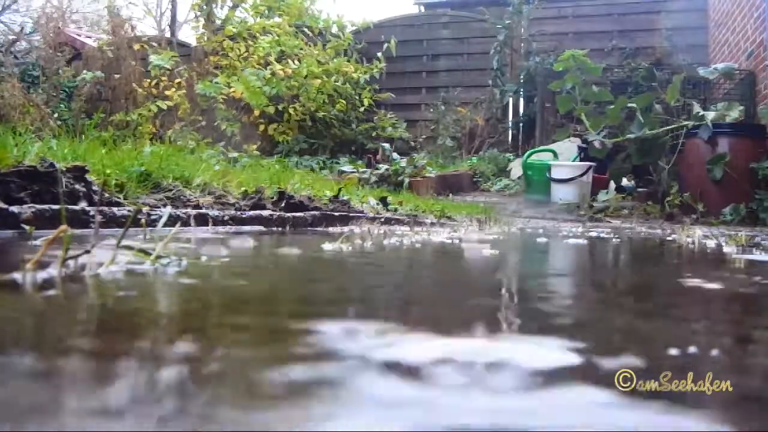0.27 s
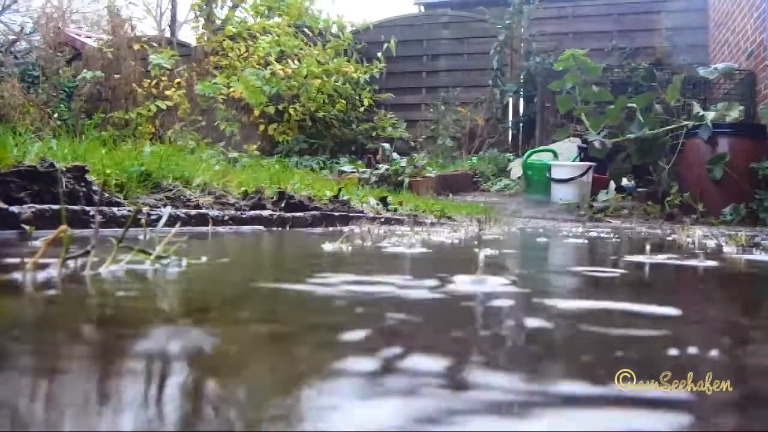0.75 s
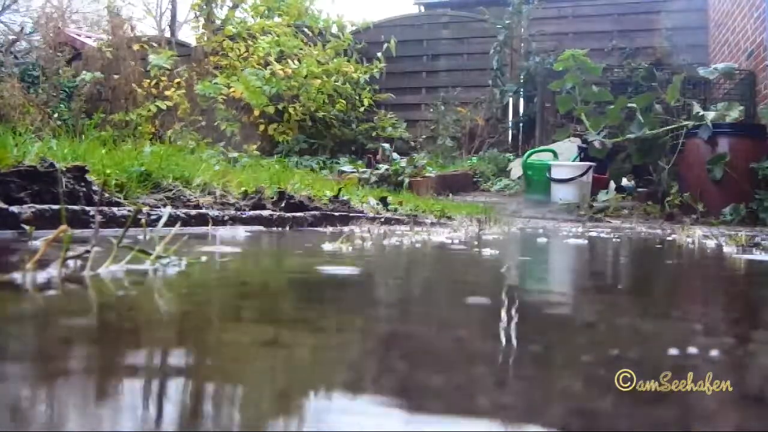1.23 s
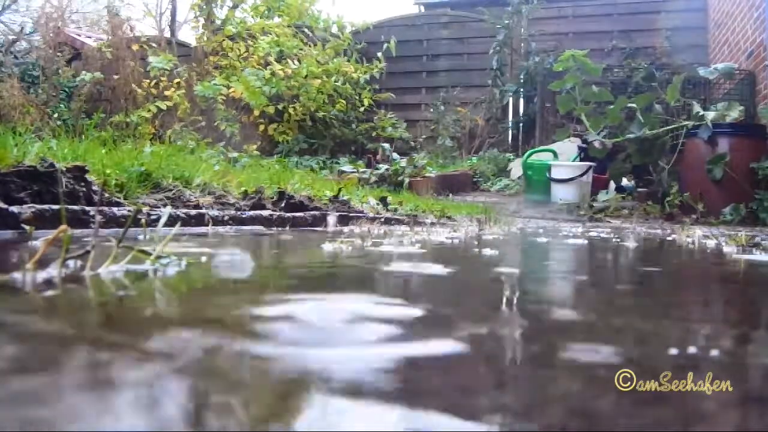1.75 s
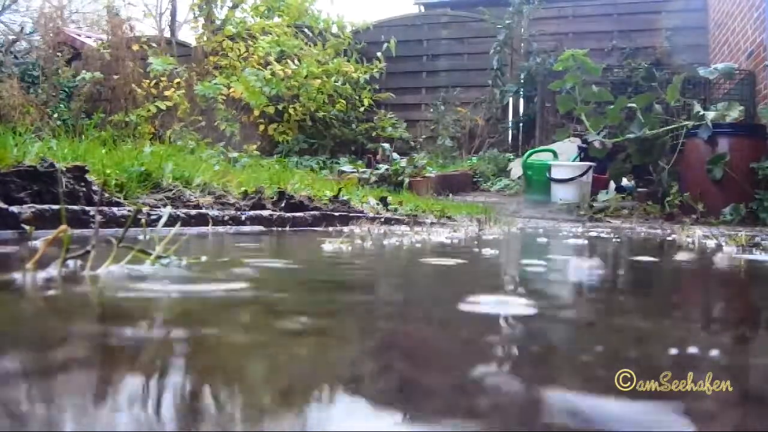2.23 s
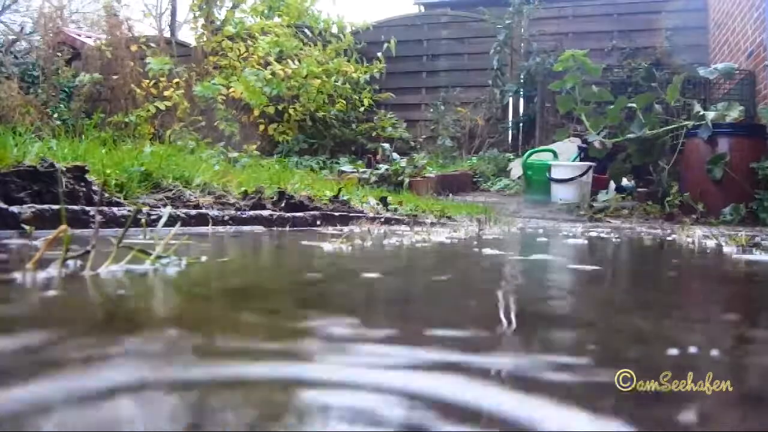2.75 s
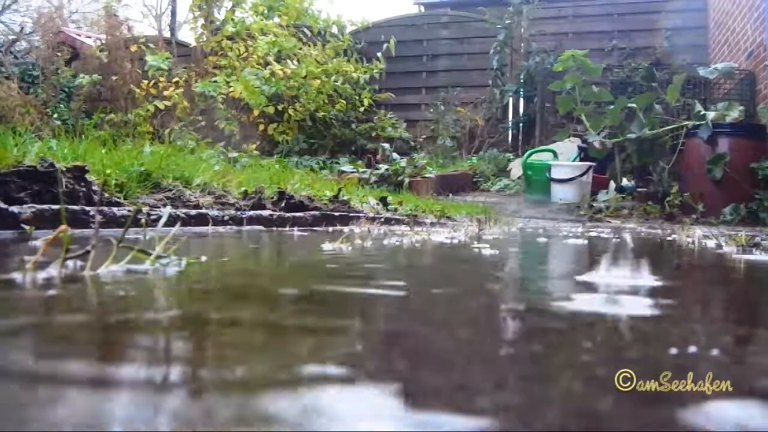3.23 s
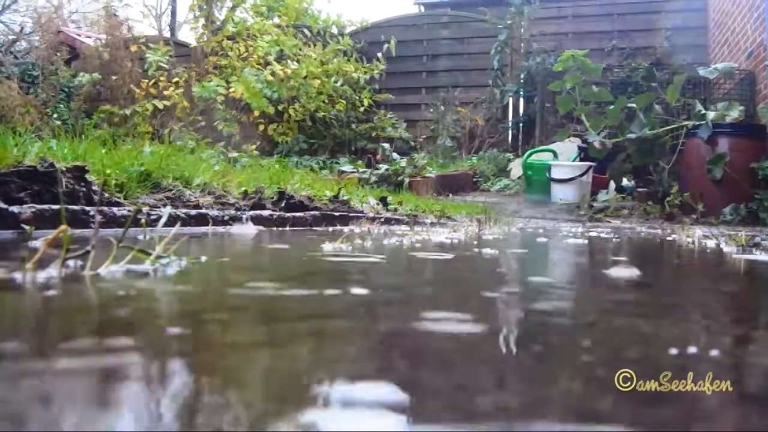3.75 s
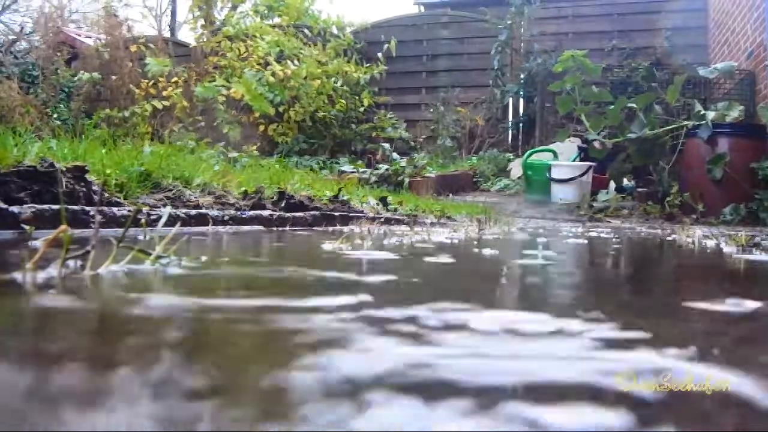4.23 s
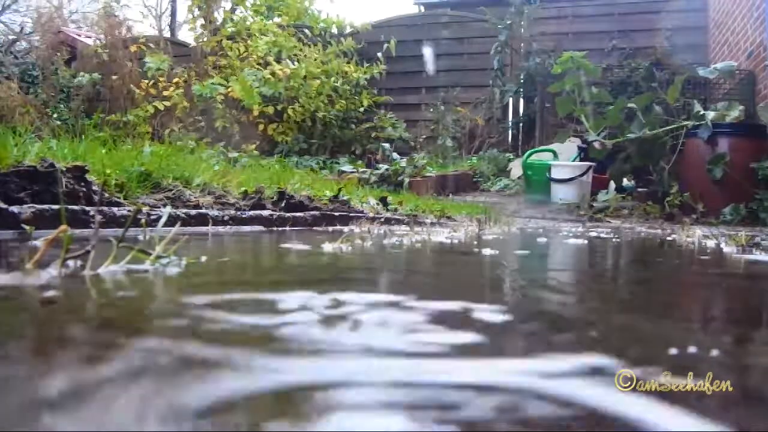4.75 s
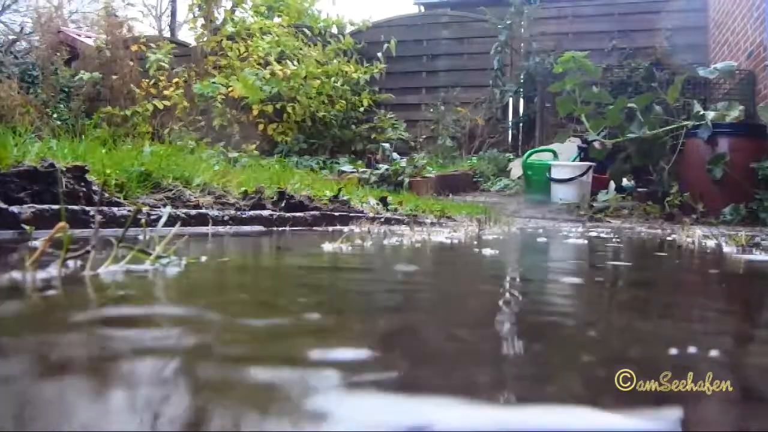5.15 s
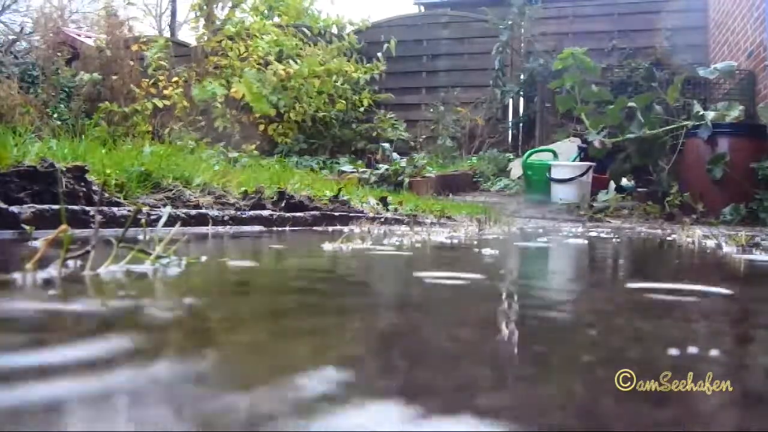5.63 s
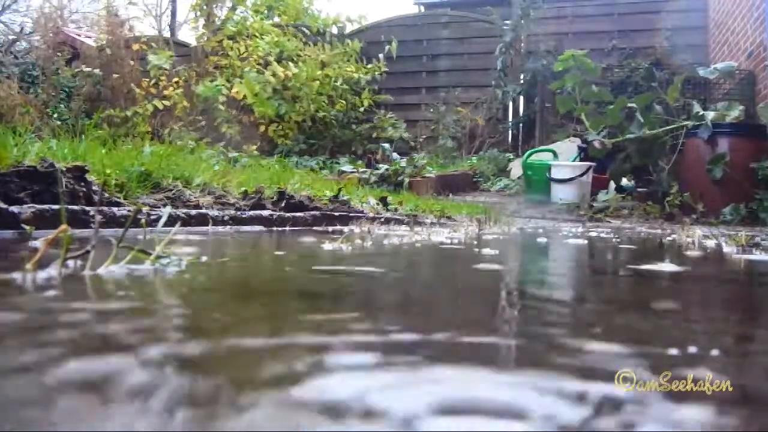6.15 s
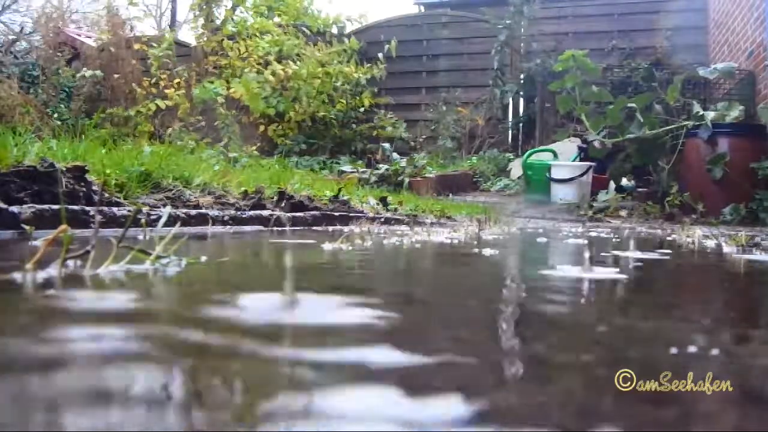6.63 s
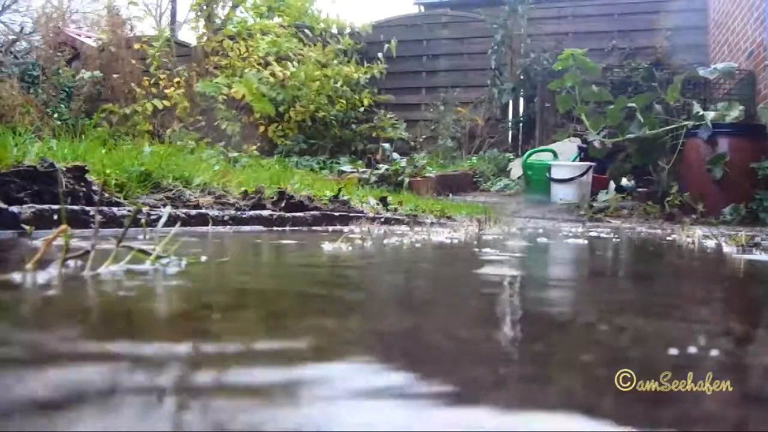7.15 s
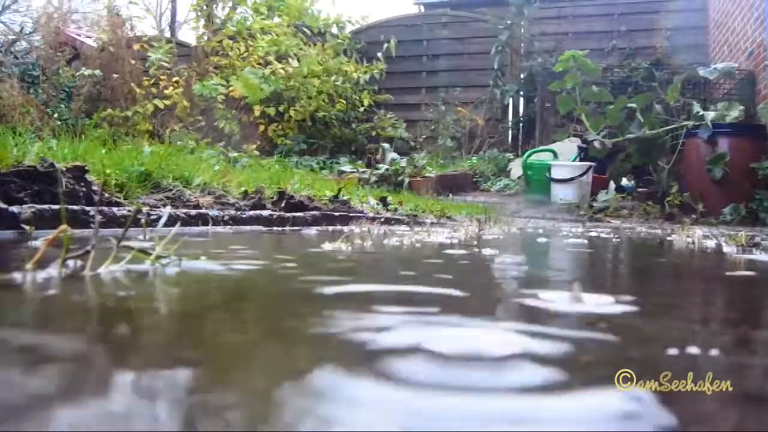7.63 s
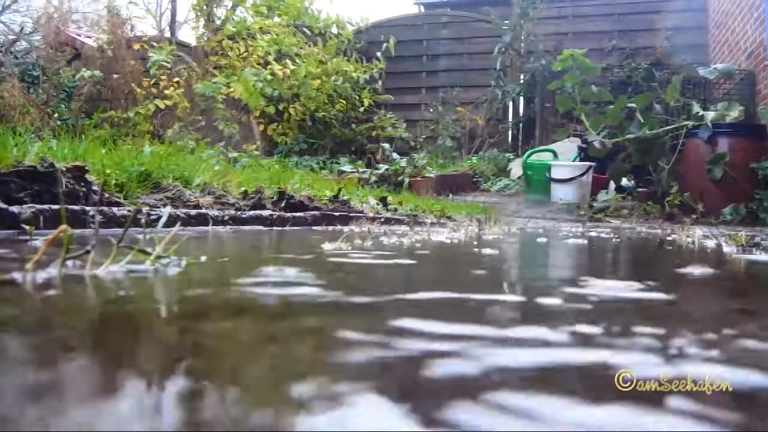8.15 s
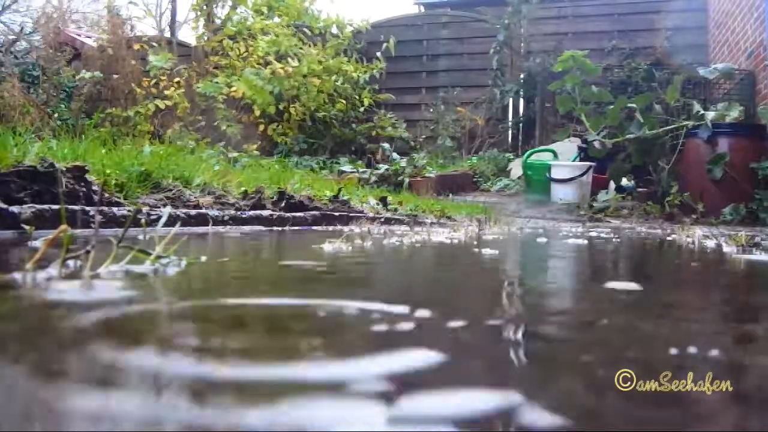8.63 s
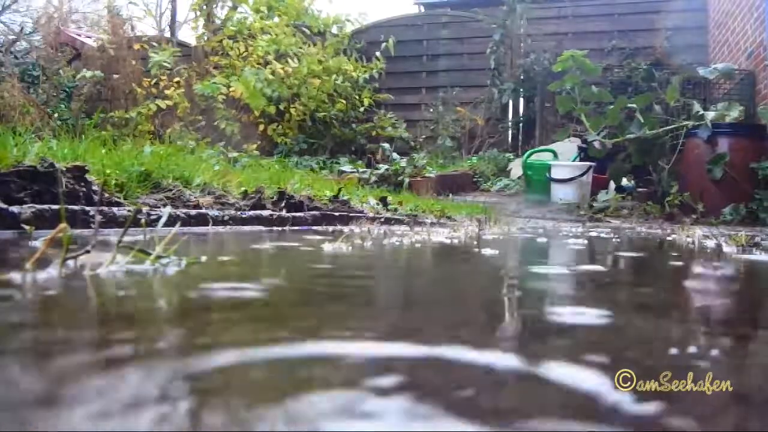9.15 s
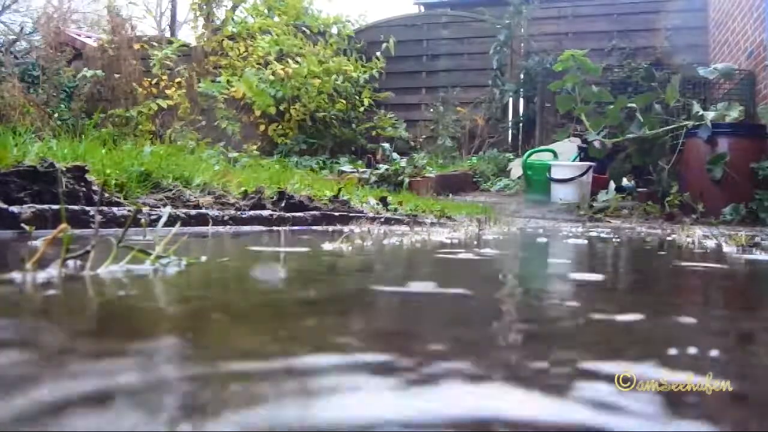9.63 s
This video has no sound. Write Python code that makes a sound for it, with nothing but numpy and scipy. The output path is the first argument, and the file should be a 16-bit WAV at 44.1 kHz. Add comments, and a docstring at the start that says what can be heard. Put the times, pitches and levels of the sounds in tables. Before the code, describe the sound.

Steady garden rain is heard for about ten seconds from a microphone low at the edge of a shallow puddle. Distant drops merge into a bright, even hiss, with dense, fine patter on water, grass and leaves. Underneath lies a dull outdoor wash, slightly louder at first. Nearer drops stand out as crisp, irregular ticks, more frequent after 5 seconds, along with a few soft, low knocks.

Several drops strike the microphone's housing, each a sharp click with a very short ring and a small thud. Loud ones land at about 0.5 and 1.5 seconds, lighter ones at 1.7 and 6.2, and the loudest at 7.1. The hardest hits overload the microphone and make the rain dip for an instant. A softer, duller knock follows near 7.9 seconds, and the hiss and ticking carry on to the end.

```python
"""A steady hiss of garden rain, heard from a camera standing low at the edge of a shallow puddle.
Countless far drops merge into that hiss, while near drops tick on the water, the grass and the leaves.
A few strike the camera itself: they ring its case, overload the microphone and make the gain duck.
Underneath lies the dull wash of the wet neighbourhood."""
import sys
import numpy as np
from scipy import signal
from scipy.fft import rfft, irfft
from scipy.io import wavfile
from scipy.ndimage import uniform_filter1d

SR = 44100
rng = np.random.default_rng(int(sys.argv[2]) if len(sys.argv) > 2 else 0)


def persist_wave(psi):
    """Save psi, clipped to +-1, as 16-bit WAV."""
    counts = np.round(np.clip(psi, -1, 1) * 32767).astype(np.int16)
    wavfile.write(sys.argv[1], SR, np.atleast_2d(counts).T)


N = 435708
TIME = np.arange(N) / SR
AGE = np.arange(SR // 20) / SR  # seconds since an impact
TOP_HZ = 12800

# tone colour of the far drops: frequency_hz, relative_level_db
HISS_COLOUR = [(1000, -25.5), (1700, -9), (2400, -8), (3400, -8.5), (4400, -7), (5400, -2.5), (6400, 2),
               (7300, -3), (8500, -7), (9500, -11), (10500, -18.5), (11500, -20.5), (12200, -31),
               (13000, -46)]
# fader ride on the hiss as the shower swells and slackens: time_s, gain_db
HISS_RIDE = [(0, 0.5), (1.8, 0.5), (2.7, -0.1), (3.2, 0.6), (4.95, -0.8), (5.5, 0.7), (5.8, -0.1),
             (7.7, 0.4), (8.1, -0.6), (8.8, 0.2), (9.3, -1.5), (9.9, 0)]
# the nearest drops on water and leaves: start_s, level_db, pitch_hz, swell_ms
NEAR_DROPS = [(0.1424, -27, 9600, 0.43), (0.3205, -31, 8250, .22), (1.584, -28, 2650, 0.85),
              (2.4163, -36, 1450, .94), (2.4316, -35, 4150, .6), (2.9928, -35, 2140, 0.77),
              (4.386, -29, 8440, .27), (5.325, -26.5, 8780, 0.097), (5.563, -25.5, 2920, 0.31),
              (5.934, -26.5, 8900, 0.1), (6.0615, -31, 9250, 0.16), (6.375, -36.5, 2080, 0.65),
              (6.535, -33.5, 3730, 0.18), (6.7712, -28.5, 5400, 0.73), (6.9562, -33, 11060, .2),
              (7.1855, -26.5, 8780, 0.29), (7.7934, -26, 3580, 0.16), (8.0787, -25.5, 5850, 0.54),
              (8.745, -32, 5110, 0.13), (8.889, -25.5, 2180, .36), (8.9261, -29.5, 6400, 0.39),
              (8.9925, -33, 4550, .2), (9.5473, -36, 2960, 0.35), (9.631, -30.5, 3610, .21),
              (9.7115, -32, 9480, .27)]
# drops that hit the camera: start_s, tick_db, tick_hz, swell_ms, ring_db, spray_db, thud_db, thud_hz
CAMERA_STRIKES = [ (0.4927, 5.5, 5490, 0.23, -29, -13, -21, 480),
                  (1.4740, 5.5, 3600, 0.22, 0, -19, -18, 650),
                  (1.746, -10.3, 5780, 0.2, -20, -24, -47, 460),
                  (6.2130, -12, 4050, 0.23, -25.5, -31, -21, 477),
                  (7.0774, 13.5, 2950, 0.11, 0.3, -19, -34, 480),
                  (7.8697, -28, 1240, 0.63, -41, -33, -20.5, 350), ]
# resonances of the camera case: pitch_hz, relative_level_db, t60_s
CASE_MODES = [(1520, -4.5, 0.0026), (2790, -6, 0.0083), (4180, -4.5, 0.0031), (4750, -24.5, 0.032),
              (6540, -3, 0.0042), (7740, -14, 0.015), (8800, -14, 0.0029)]
# soft low knocks of drops close by: start_s, level_db, pitch_hz, swell_s
SOFT_KNOCKS = [(3.729, -41, 300, .0015), (5.523, -42.5, 170, 0.0019), (5.998, -38, 302, 0.0011),
               (6.162, -44, 130, 0.0017), (7.873, -32, 148, 0.0023), (8.981, -34, 400, 0.0005)]
# tone colour of the outdoor wash: frequency_hz, relative_level_db
WASH_COLOUR = [(20, -26), (50, -16.5), (100, -13.5), (200, -13.5), (300, -11), (430, -3.5), (580, 0.5),
               (750, -2), (1000, -4), (1250, -8), (1540, -9.5), (1660, -18.5), (2400, -17), (5000, -43)]


def rain_hiss(level_db=-49, gust_db=0.58, flutter_db=0.71):
    """Countless far drops blur into a bright bed that wavers slightly with the shower."""
    ride_db = np.interp(TIME, *np.transpose(HISS_RIDE))
    waver_db = gust_db * wander(rate_hz=10) + flutter_db * wander(rate_hz=40)
    return coloured_noise(HISS_COLOUR) * undb(level_db + ride_db + waver_db)


def garden_patter():
    """High to low: finest spatter, ticks on the puddle, fuller drops on grass, taps on leaves, plops."""
    return (scatter(count=450, db=-60.5, spread_db=5, centre_hz=11200, octaves=0.23, swell_cycles=2.9)
            + scatter(count=700, db=-55.5, spread_db=5, centre_hz=8800, octaves=0.45, swell_cycles=2.2)
            + scatter(count=1500, db=-51, spread_db=4, centre_hz=6250, octaves=0.62, swell_cycles=1.5)
            + scatter(count=350, db=-54, spread_db=4, centre_hz=3020, octaves=0.8, swell_cycles=0.76)
            + scatter(count=40, db=-50.5, spread_db=3, centre_hz=1500, octaves=1.83, swell_cycles=1.3))


def near_drops(spray_db=-7.5):
    """The closest drops stand out one by one: crisp ticks with a puff of spray, and a few soft knocks."""
    out = np.zeros(N)
    for start_s, db, hz, swell_ms in NEAR_DROPS:
        add(out, start_s, tick(db, hz, swell_ms))
        add(out, start_s, spray(db + spray_db, 0.65 * hz, min(1.34 * hz, 10500), decay_s=0.0016))
    for start_s, db, hz, swell_s in SOFT_KNOCKS:
        add(out, start_s, thud(db, hz, swell_s))
    return out


def camera_strikes(thud_swell_cycles=0.19):
    """Each hit layers a sharp tick, a ring of the case, a burst of spray and a thud through the body."""
    out = np.zeros(N)
    case_ring = sum(undb(db - 60 * AGE / t60_s) * np.sin(2 * np.pi * hz * AGE)
                    for hz, db, t60_s in CASE_MODES)
    for start_s, tick_db, tick_hz, swell_ms, ring_db, spray_db, thud_db, thud_hz in CAMERA_STRIKES:
        add(out, start_s, tick(tick_db, tick_hz, swell_ms))
        add(out, start_s, undb(ring_db) * case_ring)
        add(out, start_s, spray(spray_db, 1220, 7300, decay_s=0.0014))
        add(out, start_s, thud(thud_db, thud_hz, thud_swell_cycles / thud_hz))
    return out


def outdoor_wash(level_db=-50.5, ring_db=-66.5, ring_hz=1465, ring_width_hz=41):
    """The wet neighbourhood: a dull bed with one faint, narrow ring. It starts louder and settles."""
    resonance = signal.iirpeak(ring_hz, ring_hz / ring_width_hz, fs=SR)
    ring = signal.lfilter(*resonance, rng.standard_normal(N))
    bed = undb(level_db) * coloured_noise(WASH_COLOUR) + at_level(ring, ring_db)
    surge_db = 1.5 * np.exp(-TIME / 1.4)
    waver_db = 0.76 * wander(rate_hz=14)
    return bed * undb(surge_db + waver_db)


def scatter(count, db, spread_db, centre_hz, octaves, swell_cycles):
    """Drops land at random: most are far and faint, a few nearer; small ones tick higher and shorter."""
    out = np.zeros(N)
    for when, distance, smallness, softness in rng.random((count, 4)):
        hz = min(centre_hz * 2 ** (octaves * (smallness - 0.5)), TOP_HZ)
        closeness = -np.log(distance + 0.01)
        swell_ms = 1000 * swell_cycles * (0.5 + softness) / hz
        add(out, when * N / SR, tick(db + spread_db * closeness, hz, swell_ms))
    return out


def tick(db, hz, swell_ms, contact_hz=8970, flatten_s=0.00014):
    """A drop's impact: bright at first touch, it glides to its own pitch as the drop flattens."""
    swell_s = swell_ms / 1000
    age = AGE[:int(10 * swell_s * SR) + 2]
    glide_cycles = (contact_hz - hz) * flatten_s * (1 - np.exp(-age / flatten_s))
    return pulse(db, hz * age + glide_cycles, swell_s)


def spray(db, low_hz, high_hz, decay_s):
    """The burst of tiny droplets that an impact throws off."""
    band = signal.butter(2, [low_hz, high_hz], "band", fs=SR, output="sos")
    fizz = signal.sosfilt(band, rng.standard_normal(len(AGE)))
    return at_level(fizz, db) * np.exp(-AGE / decay_s)


def thud(db, hz, swell_s):
    """A dull blow, low-cut so that it leaves no lasting push."""
    low_cut = signal.butter(2, 0.53 * hz, "high", fs=SR, output="sos")
    return signal.sosfilt(low_cut, pulse(db, hz * AGE, swell_s))


def pulse(db, phase_cycles, swell_s):
    """A sine blip whose envelope peaks at swell_s and dies straight away."""
    age = AGE[:len(phase_cycles)]
    envelope = age / swell_s * np.exp(1 - age / swell_s)
    return undb(db) * envelope * np.sin(2 * np.pi * phase_cycles)


def coloured_noise(colour):
    """Noise of rms 1, shaped by an EQ curve of (frequency_hz, level_db) points."""
    hz, db = np.transpose(colour)
    bins_hz = np.maximum(np.fft.rfftfreq(N, 1 / SR), 1)
    eq_db = np.interp(np.log(bins_hz), np.log(hz), db)
    spectrum = rfft(rng.standard_normal(N)) * undb(eq_db)
    return at_level(irfft(spectrum, N), 0)


def wander(rate_hz):
    """A random modulator of rms 1 that glides to a new value rate_hz times a second."""
    hold = int(SR / rate_hz)
    steps = np.repeat(rng.standard_normal(N // hold + 1), hold)[:N]
    return at_level(uniform_filter1d(steps, hold), 0)


def undb(db):
    """Gain of a level in dB."""
    return 10 ** (np.asarray(db) / 20)


def at_level(x, db):
    """The sound brought to an rms level."""
    return x * undb(db) / np.sqrt(np.mean(x ** 2))


def add(out, start_s, sound):
    """Mix a short sound in at its cue."""
    start = int(round(start_s * SR))
    slot = out[start:start + len(sound)]
    slot += sound[:len(slot)]


def scene():
    """The mono mix: hiss, patter, close drops and strikes over the wash."""
    return (rain_hiss() + garden_patter() + near_drops() + camera_strikes() + outdoor_wash())[None]


def duck(x, threshold_db=-25, attack_s=0.0034, release_db_per_s=80, deepest_db=6):
    """The camera's gain drops just after an overload and creeps back."""
    pole = np.exp(-1 / (attack_s * SR))
    smoother = [1 - pole], [1, -pole]
    envelope = signal.lfilter(*smoother, np.abs(x))
    over_db = np.maximum(20 * np.log10(envelope + 1e-9) - threshold_db, 0)
    release_db = release_db_per_s * TIME
    held_db = np.maximum.accumulate(over_db + release_db, axis=-1) - release_db
    cut_db = signal.lfilter(*smoother, np.minimum(held_db, deepest_db))
    return x * undb(-cut_db)


def record(dry, notch_hz=7680, notch_mix=0.46):
    """The microphone port carves a narrow notch; the gain ducks, peaks clip and the top is cut."""
    notched = signal.lfilter(*signal.iirnotch(notch_hz, Q=35, fs=SR), dry)
    port = dry + notch_mix * (notched - dry)
    clipped = np.clip(duck(port), -1, 1)
    high_cut = signal.ellip(8, 0.2, 70, TOP_HZ, fs=SR, output="sos")
    return signal.sosfilt(high_cut, clipped)


dry = scene()
out = record(dry)
persist_wave(out)
```